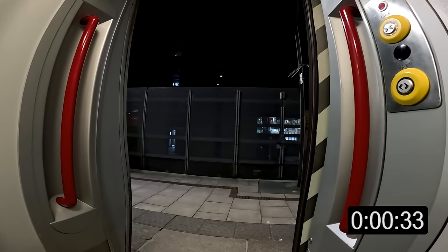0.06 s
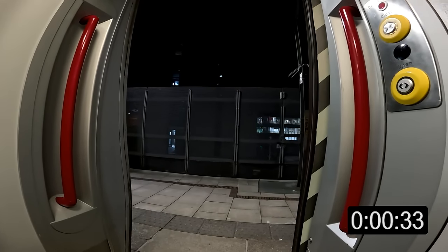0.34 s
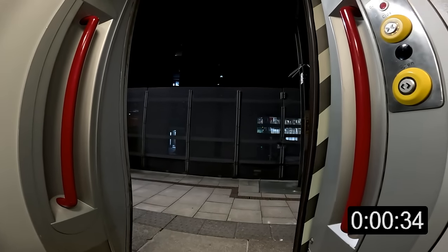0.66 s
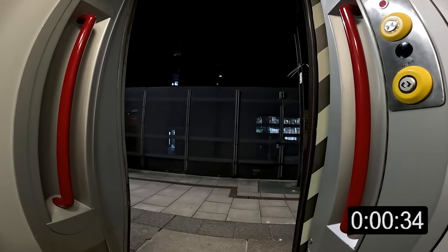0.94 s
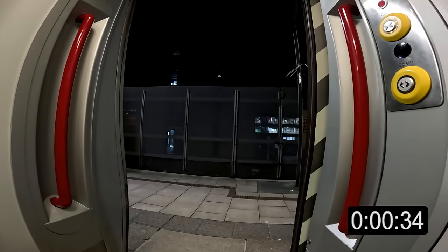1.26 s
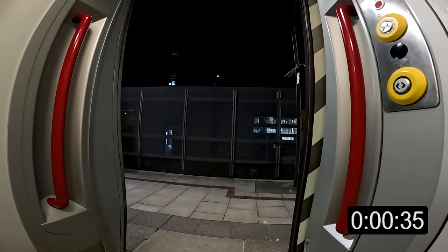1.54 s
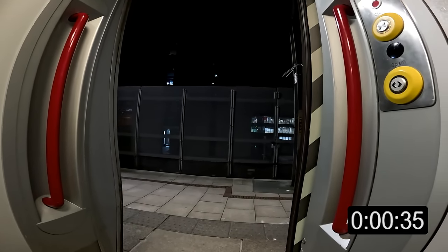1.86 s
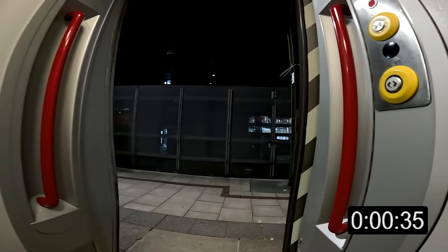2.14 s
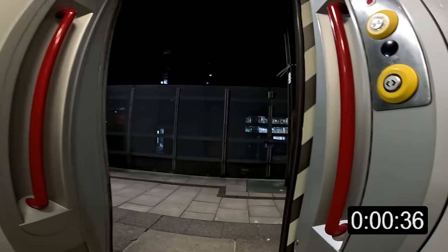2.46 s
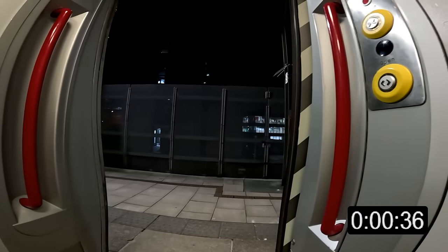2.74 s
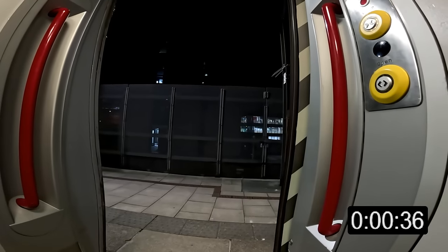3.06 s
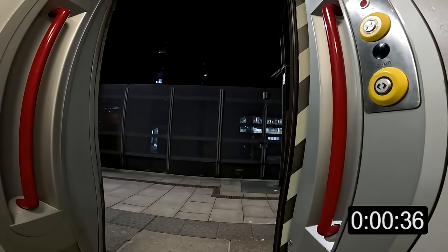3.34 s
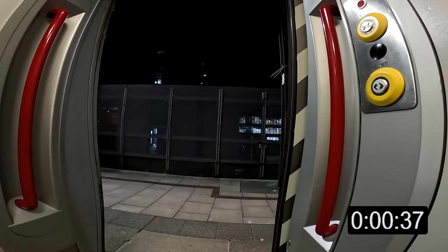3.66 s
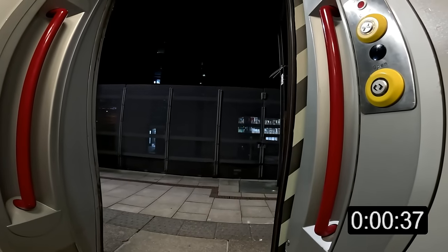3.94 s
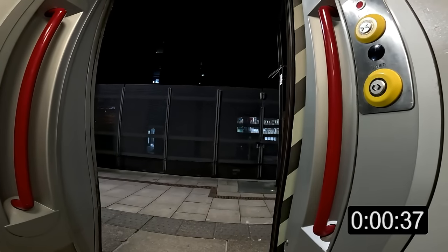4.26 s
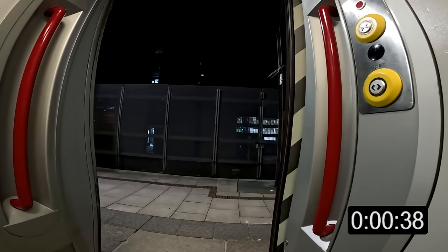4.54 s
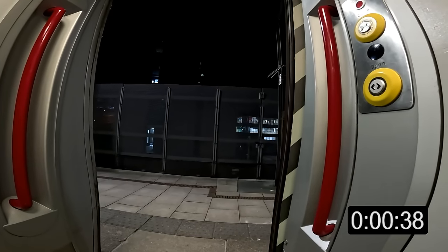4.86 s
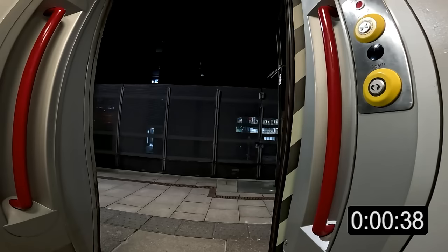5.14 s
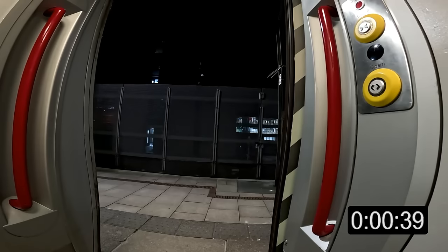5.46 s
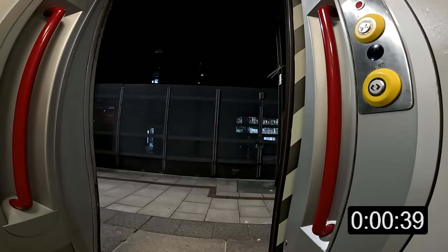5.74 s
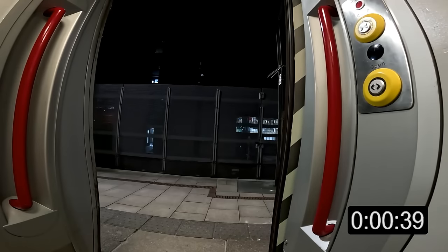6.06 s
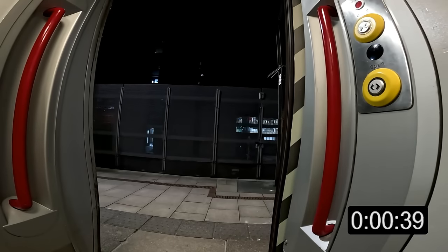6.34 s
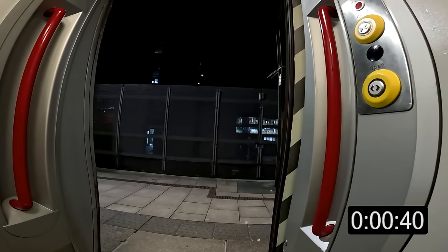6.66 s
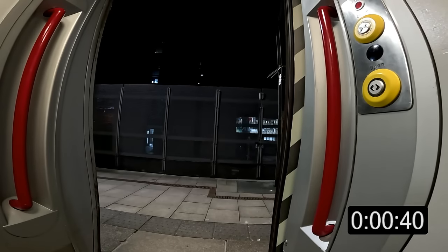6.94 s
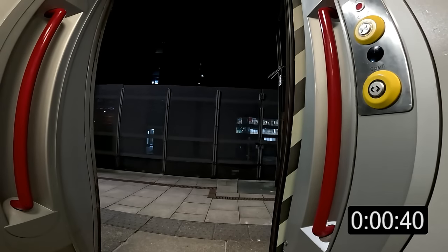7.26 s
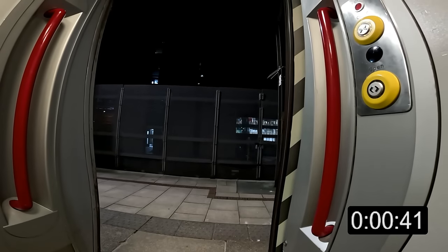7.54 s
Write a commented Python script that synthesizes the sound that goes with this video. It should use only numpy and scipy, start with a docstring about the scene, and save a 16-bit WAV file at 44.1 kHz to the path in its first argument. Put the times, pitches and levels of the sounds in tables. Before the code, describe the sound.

A diesel passenger train idles at a platform for the whole of about eight seconds, heard from just inside its open door. The main sound is a deep, steady engine drone and rumble from under the floor, throbbing with quick soft thumps. Its low tones slowly swell and fade against each other while speed and loudness stay nearly constant. A quieter, rapid metallic knocking rides on top, with fine valve ticking and faint air puffs about eight times a second. Soft ventilation hiss and a very faint gear whine continue throughout. Loose panels buzz briefly and quietly around 0.4, 1.3, 2.1, 4.5, 6.4 and 7.4 seconds. The door trim gives small ticks near 1.2, 2.2, 2.4, 3.6 and 7.3 seconds, with a few barely audible light rustles close by.

```python
"""Diesel railcar idling at night

Heard from inside its open door at a platform. The six-cylinder engine under the floor drones, thumps,
knocks, ticks and puffs air once a cycle, beating slowly against the next car's engine. Gears sing
faintly, loose panels buzz, ventilation hisses, and the door trim ticks now and then."""
import sys
import numpy as np
from scipy import signal
from scipy.fft import rfft, irfft, next_fast_len
from scipy.io import wavfile
from scipy.ndimage import map_coordinates

SR = 44100
rng = np.random.default_rng(int(sys.argv[2]) if len(sys.argv) > 2 else 0)


def unload_wav(signal):
    """Save mono or channel-first audio to the path in sys.argv[1] as 16-bit WAV at rate SR, clipped to [-1, 1]."""
    wavfile.write(
        sys.argv[1],
        SR,
        np.round(np.clip(np.atleast_2d(signal).T, -1, 1) * 32767).astype(np.int16),
    )


N = 339349

CYLINDERS, CYCLE_HZ = 6, 8.29  # one cycle = two crank turns; order = multiple of the cycle rate
SLIP_HZ = 0.059  # next car's engine runs this much faster
THUMP_AT_CYCLES = 0.385  # phase reference of the drone and firing orders

# governor sag and recovery: t/s, cycle rate/Hz
IDLE_SPEED = [(0, 8.3), (2.5, 8.295), (3.1, 8.24), (4.2, 8.265), (5.2, 8.36), (6.2, 8.29), (7, 8.335),
              (7.69, 8.33)]
# exhaust and body drone: order, relative level/dB
DRONE_ORDERS = [(2, -5.5), (4, -5), (5, -10), (7, -19.5), (8, -8.5), (9, -14), (10, -13), (11, -14),
                (13, -13), (14, -13.5), (15, -12), (16, -24), (19, -21), (20, -24), (21, -18.5), (22, -12),
                (25, -17), (26, -22.5), (28, -23), (29, -21.5), (33, -24)]
# orders shared with the next car: order, level/dB, its amplitude ratio, in step at t/s
BEAT_ORDERS = [(3, -26.5, 0.59, 3), (24, -39.5, 0.3, 0.33), (30, -42.5, 0.22, 0.48)]
# gear mesh: order, level/dB
GEAR_ORDERS = [(53, -53), (72, -56.5), (84, -48.5), (92, -54), (96, -47), (99, -51), (102, -48),
               (119, -50.5), (138, -52)]
# firing rate x1, x2, x3: t/s, level/dB
FIRING_X1 = [(0, -41), (0.6, -25), (1.3, -27), (2, -39), (2.4, -30), (2.8, -44), (3.3, -32), (4.5, -30.5),
             (5.2, -27.5), (5.7, -26.5), (6.2, -27), (6.7, -32), (7.2, -30), (7.69, -28)]
FIRING_X2 = [(0, -32.5), (1.2, -36.5), (1.8, -31.5), (2.3, -33), (3, -41), (3.4, -29), (3.9, -32.5),
             (4.4, -26.5), (4.8, -33.5), (5.6, -42.5), (6.5, -30.5), (7.69, -29.5)]
FIRING_X3 = [(0.05, -28), (0.32, -31), (0.55, -39.5), (0.86, -32), (1.34, -26), (1.84, -41.5), (2.29, -26),
             (2.47, -33.5), (2.56, -40), (2.93, -28.5), (3.85, -34), (4.23, -26.5), (4.75, -36),
             (4.9, -26.5), (5.56, -39.5), (5.94, -28.5), (6.36, -39), (6.73, -27), (7.47, -38), (7.55, -37)]
# wavering rotor whine: t/s, level/dB
WHINE_LEVEL = [(0, -65), (1.5, -67), (3, -60), (4, -73), (7.69, -72)]
# doorway transmission, lower as the listener leans back: t/s, gain/dB
DOORWAY_GAIN = [(0, 0.43), (1.2, 0.14), (2.7, -0.5), (3.3, -0.6), (4.2, -1.43), (4.85, -1), (5.2, -0.06),
                (7.69, -0.04)]
# knock hardness per cylinder, in firing order: relative level/dB
HARDNESS_DB = [-11, 4, 1.5, -4, 5, -24]
# panel buzzes: t/s, level/dB, half-width/s, f/Hz
PANEL_BUZZES = [(0.404, -29, 0.143, 199), (1.19, -35, 0.037, 595), (1.365, -39, 0.099, 590),
                (2.095, -37, 0.073, 835), (4.37, -40.5, 0.028, 1740), (4.55, -42, 0.055, 900),
                (6.448, -40, 0.33, 869), (7.388, -37.5, 0.025, 1740)]
# trim ticks: t/s, relative level/dB, tilt/(dB per octave)
TRIM_TICKS = [(1.1754, -51, 5), (2.174, -40, -5), (2.3554, -49, 3), (3.6174, -46, -1), (7.2884, -44, -2)]
# high rustles: t/s, relative level/dB, half-width/s
RUSTLE_EVENTS = [(1.183, -73, .012), (2.13, -66, .014), (2.18, -67, .014), (2.37, -72, .02),
                 (2.43, -72, .025), (3.09, -73, .03), (3.65, -76, .06), (7.14, -69, 0.028),
                 (7.617, -72, .03)]
# noise spectra: f/Hz, relative level/dB
RUMBLE_SPECTRUM = [(5, -8), (12, -2), (31, 8.5), (38, 4), (60, -1.5), (110, 2.5), (130, 2), (155, -5.5),
                   (235, -4.5), (290, -11.5), (400, -19.5), (700, -81), (2000, -120)]
BLOCK_SPECTRUM = [(60, -61), (200, -16), (330, -3), (480, -6), (590, -2.5), (670, -4), (780, -3), (900, 1),
                  (1000, -1.5), (1080, -5.5), (1480, -7), (1750, -4.5), (1850, -14.5), (2100, -21.5),
                  (4000, -49), (9000, -120)]
COVER_SPECTRUM = [(1350, -45), (1600, -3.5), (1700, 0), (1780, 0), (1830, -8), (1920, -19), (2300, -58)]
TAPPET_SPECTRUM = [(2000, -37), (3600, 1.5), (4800, 2.5), (7200, -7.5), (8000, -7), (9600, -8),
                   (11000, -34), (14000, -50)]
VENT_SPECTRUM = [(1200, -5.5), (2100, -1.5), (2750, -2), (3150, 2.5), (3600, -4), (5800, -11.5),
                 (7200, -13.5), (8000, -20.5), (8800, -18), (9700, -20.5), (11100, -33.5), (12200, -32.5),
                 (13200, -36), (14400, -44), (15200, -56)]
PUFF_SPECTRUM = [(2000, -66), (4000, -16), (5400, -5.5), (6500, -3), (7300, -1), (7900, -17), (9500, -13.5),
                 (12000, -60)]
TRIM_SPECTRUM = [(900, -10), (1800, 11), (2300, 11), (3200, 9), (5000, 2), (9000, -8), (11500, -28),
                 (15000, -32)]
RUSTLE_SPECTRUM = [(5000, -13), (9000, 0), (12500, -1), (13300, -8), (15000, -16)]
# left-right likeness: f/Hz, correlation
EAR_CORRELATION = [(150, 1), (350, 0.95), (700, 0.91), (1400, 0.8), (2600, 0.52), (5000, 0.77), (9000, 0.7),
                   (13000, 0.45)]


def drone(cycles, throb=0.14):
    """Exhaust pulses shake the car body at engine orders, over a turbulent rumble."""
    since = cycles - THUMP_AT_CYCLES
    orders = 0
    for k, db in DRONE_ORDERS:
        from_thumps = k % 2 == 0 and k > 7  # these stay roughly in step with the thumps
        orders += amp(db) * tone(since, k, waver=0.3, rate_hz=1.58, loose_turns=.4 if from_thumps else 1)
    # alternate cycles differ: weak lines halfway between the orders
    lope = sum(amp(at_hz(RUMBLE_SPECTRUM, k * CYCLE_HZ)) * np.cos(2 * np.pi * (k * cycles + rng.random()))
               for k in np.arange(1, 34) + .5)
    rumble = amp(-29.8) * stereo(white(), RUMBLE_SPECTRUM)
    surge = unit(1 + throb * np.cos(2 * np.pi * 2 * since))  # once per crank turn
    return amp(-27.3) * orders + surge * (amp(-35) * unit(lope) + rumble)


def engine_beat(cycles):
    """Two engines drift in and out of step; each shared order beats at its multiple of the slip."""
    out = 0
    for k, db, ratio, in_step_s in BEAT_ORDERS:
        beat = np.abs(1 + ratio * np.exp(2j * np.pi * k * SLIP_HZ * (clock() - in_step_s)))
        out += amp(db) * unit(beat) * tone(cycles, k, waver=0.085, rate_hz=2.88)
    return out


def firing_hum(cycles):
    """Three harmonics of the firing rate swell and fade independently."""
    since = cycles - THUMP_AT_CYCLES
    note = tone(since, CYLINDERS, waver=0.11, rate_hz=3.4)
    octave = tone(since, 2 * CYLINDERS, waver=0.1, rate_hz=2.92, loose_turns=0.23)
    hum = tone(since, 3 * CYLINDERS, waver=0.03, rate_hz=2.8, loose_turns=0.25)
    return amp(curve(FIRING_X1)) * note + amp(curve(FIRING_X2)) * octave + amp(curve(FIRING_X3)) * hum


def knock(cycles, doorway_db, level_db=-32.5, t60_s=0.13, ring_share=0.36, churn_hz=5.9):
    """Each firing clacks and rings the block in its cylinder's own way, amid loose clatter."""
    firings = CYLINDERS * cycles
    starts = crossings(firings)
    forces = amp(1.2 * rng.standard_normal(512))[:len(starts)]
    t = np.arange(SR // 5) / SR
    envelope = amp(-60 * t / t60_s) * (1 - np.exp(-t / 0.013))  # builds over many paths to the door
    ring = np.zeros((2, N))
    for cylinder in range(CYLINDERS):
        blows = np.zeros(N)
        blows[starts[cylinder::CYLINDERS]] = forces[cylinder::CYLINDERS]
        response = envelope * rng.standard_normal((2, len(t)))
        ring += signal.fftconvolve(blows[None], response, axes=1)[:, :N]
    hardness = amp(HARDNESS_DB)[np.floor(firings).astype(int) % CYLINDERS]
    clacks = 1 + 0.27 * hardness * np.exp(-((firings % 1 - 0.1) / 0.24) ** 2)
    clatter = np.sqrt(ring_share) * unit(ring) + np.sqrt(1 - ring_share) * white()
    churn_db = 0.35 * np.sin(2 * np.pi * churn_hz * clock()) + 0.5 * wobble(14)
    return amp(level_db + doorway_db + churn_db) * stereo(clacks * clatter, BLOCK_SPECTRUM)


def thump(cycles, level_db=-34, ring_hz=92, t60_s=0.043, attack_s=0.008, jitter_s=0.0012, scatter_db=2.5):
    """Each crank turn thumps the floor a little unevenly; the floor rings briefly."""
    turns = 2 * (cycles + CYCLE_HZ * jitter_s * wobble(17)) + 0.4726
    blows = impulses(turns, scatter_db * rng.standard_normal(256))
    t = np.arange(SR // 5) / SR
    floor = np.sin(2 * np.pi * ring_hz * t) * amp(-60 * t / t60_s) * (1 - np.exp(-t / attack_s)) ** 2
    return amp(level_db) * unit(signal.fftconvolve(blows, floor)[:N])


def cover(cycles, doorway_db, level_db=-46, peak_cycles=0.23, uneven_db=1.7):
    """A metal engine cover rings brightly, hardest at one cylinder's firing, never twice alike."""
    phase = 2 * np.pi * (cycles - peak_cycles)
    pulses = np.exp(0.53 * np.cos(phase) + 0.25 * np.cos(CYLINDERS * phase))
    envelope = unit(pulses * amp(uneven_db * wobble(15)))
    return amp(level_db + 2.3 * doorway_db) * envelope * stereo(white(), COVER_SPECTRUM)


def tappets(cycles, doorway_db, level_db=-57, t60_s=0.025, scatter_db=3):
    """Two valves per cylinder tick shut with varying force."""
    closings = 2 * CYLINDERS * cycles + 0.3 * wobble(30)
    blows = impulses(closings, scatter_db * np.clip(rng.standard_normal(1024), -2, 2))
    decay = amp(-60 * np.arange(SR // 10) / SR / t60_s)
    envelope = unit(signal.fftconvolve(blows, decay)[:N])
    return amp(level_db + 2.3 * doorway_db) * envelope * stereo(white(), TAPPET_SPECTRUM)


def air_puff(cycles, doorway_db, level_db=-59.5, open_cycles=0.73, rise_cycles=0.03, hold_cycles=0.32):
    """Once a cycle air starts sharply, holds and stops; the door frame screens it strongly."""
    since = (cycles - open_cycles) % 1
    gate = unit((1 - np.exp(-since / rise_cycles)) * np.exp(-(since / hold_cycles) ** 4))
    gain = amp(level_db + 3.6 * doorway_db + 1.2 * wobble(33))
    return gain * gate * stereo(wall_echoes(white()), PUFF_SPECTRUM)


def gears(cycles, steady_hz=2854, wavering_hz=2784):
    """Timing gears sing on high orders; small fast rotors add two thin whines."""
    mesh = sum(amp(db) * tone(cycles, k, waver=0.7, rate_hz=7, ear_rad=rng.normal(0, 0.19))
               for k, db in GEAR_ORDERS)
    steady = tone(clock(), steady_hz, waver=0.29, rate_hz=4.6, ear_rad=0.68)
    wavering = tone(clock(), wavering_hz, waver=1, rate_hz=25, ear_rad=0.37)
    return mesh + amp(-58) * steady + amp(curve(WHINE_LEVEL)) * wavering


def panels():
    """Loose panels catch the vibration and buzz briefly."""
    return sum(amp(db) * swell(at_s, width_s) * tone(clock(), hz, waver=2, rate_hz=hz / 14)
               for at_s, db, width_s, hz in PANEL_BUZZES)


def ventilation(doorway_db, level_db=-42):
    """Air hiss with slight flutter."""
    return amp(level_db + doorway_db + 0.69 * wobble(24)) * stereo(wall_echoes(white()), VENT_SPECTRUM)


def trim(t60_s=0.08, attack_s=0.003):
    """Door trim ticks, dull or bright."""
    ticks = 0
    for at_s, db, tilt in TRIM_TICKS:
        age_s = np.maximum(clock() - at_s, 0)
        envelope = amp(db + 12 - 60 * age_s / t60_s) * (1 - np.exp(-age_s / attack_s))
        spectrum = [(hz, level + tilt * np.log2(hz)) for hz, level in TRIM_SPECTRUM]
        ticks += envelope * stereo(white(), spectrum)
    return ticks


def rustles():
    """Something light rustles close by."""
    envelope = sum(amp(db + 5) * swell(at_s, width_s) for at_s, db, width_s in RUSTLE_EVENTS)
    return envelope * stereo(white(), RUSTLE_SPECTRUM)


def wall_echoes(x, gain=0.078, first_s=0.000986, span_s=0.03, count=10):
    """Weak echoes off close walls ripple the spectrum."""
    lags = (SR * (first_s + span_s * rng.random(count))).astype(int)
    return x + gain * sum(np.roll(x, lag, axis=-1) for lag in lags)


def tone(base, multiple, waver, rate_hz, ear_rad=0, loose_turns=1):
    """Wavering stereo tone, rms 1; phase/turns = base * multiple + a random offset within loose_turns."""
    drift = 1 + waver * (wobble(rate_hz) + 1j * wobble(rate_hz))
    offset = loose_turns * (rng.random() - .5)
    wave = drift * np.exp(2j * np.pi * (multiple * base + offset))
    return unit(np.real(wave * np.exp(1j * ear_rad * np.array([[1], [-1]]))))


def stereo(pair, spectrum):
    """Two unrelated signals to coloured stereo, rms 1, near mono in the bass."""
    def response(hz):
        angle = np.arccos(at_hz(EAR_CORRELATION, hz)) / 2
        return amp(at_hz(spectrum, hz)) * [np.cos(angle), np.sin(angle)]
    mid, side = filtered(pair, response)
    return unit(np.array([mid + side, mid - side]))


def filtered(x, response):
    """FFT filter; response maps f/Hz to gain."""
    size = next_fast_len(N + SR // 2)
    return irfft(rfft(x, size) * response(np.fft.rfftfreq(size, 1 / SR)), size)[..., :N]


def wobble(rate_hz):
    """Smooth random curve, knots at rate_hz."""
    coarse_s = clock()[::100]
    knots = rng.standard_normal(256)
    return np.interp(clock(), coarse_s, map_coordinates(knots, [coarse_s * rate_hz], mode="wrap"))


def crossings(count):
    """Samples where count passes a whole number."""
    return np.flatnonzero(np.diff(np.floor(count)) > 0)


def impulses(count, levels_db):
    """One impulse per crossing."""
    starts = crossings(count)
    blows = np.zeros(N)
    blows[starts] = amp(levels_db)[:len(starts)]
    return blows


def at_hz(points, hz):
    """Table read on a log frequency axis."""
    f, values = np.transpose(points)
    return np.interp(np.log(hz + 1), np.log(f + 1), values)


def curve(points):
    return np.interp(clock(), *np.transpose(points))


def swell(at_s, width_s):
    return np.exp(-((clock() - at_s) / width_s) ** 2)


def white():
    return rng.standard_normal((2, N))


def clock():
    return np.arange(N) / SR


def amp(db):
    return 10 ** (np.asarray(db) / 20)


def unit(x):
    return x / np.sqrt(np.mean(x ** 2) + 1e-20)


def scene():
    """The governor holds idle with a slight hunt; the engine layers follow the crank."""
    cycles = np.cumsum(curve(IDLE_SPEED)) / SR + 0.003 * wobble(1.2) + 0.0014 * wobble(8)
    doorway_db = curve(DOORWAY_GAIN)
    body = engine_beat(cycles) + firing_hum(cycles) + thump(cycles) + drone(cycles)
    treble = ventilation(doorway_db) + air_puff(cycles, doorway_db) + tappets(cycles, doorway_db)
    clatter = knock(cycles, doorway_db) + cover(cycles, doorway_db)
    panned = body * amp([[.2], [-.2]]) + treble * amp([[-.35], [.35]])
    return panned + clatter + gears(cycles) + trim() + rustles() + panels()


def record(dry, fade_s=0.003, top_hz=15200):
    """Edge fades and band limit."""
    edges = np.clip(np.minimum(clock(), clock()[::-1]) / fade_s, 0, 1)
    return filtered(dry * edges, lambda hz: hz < top_hz)


dry = scene()
out = record(dry)
unload_wav(out)
```